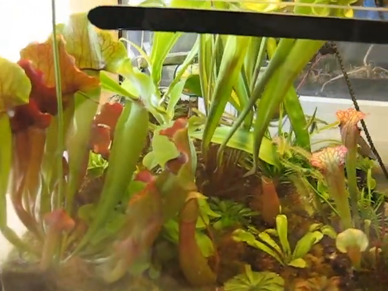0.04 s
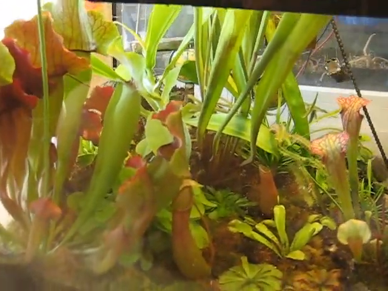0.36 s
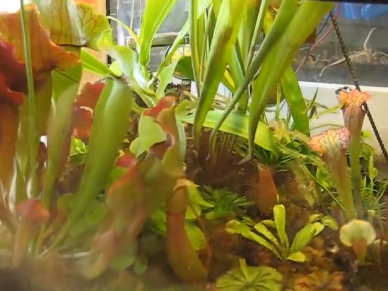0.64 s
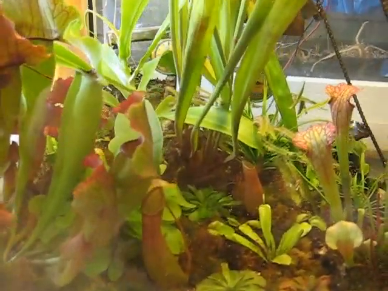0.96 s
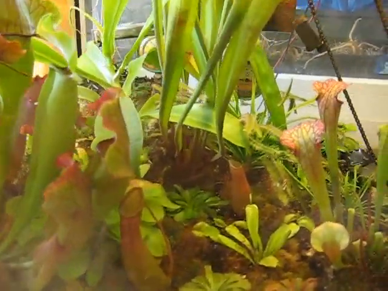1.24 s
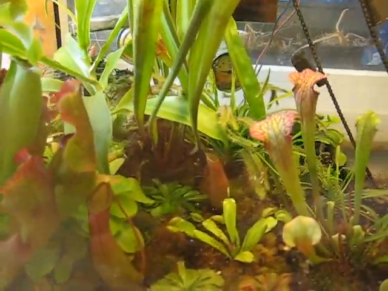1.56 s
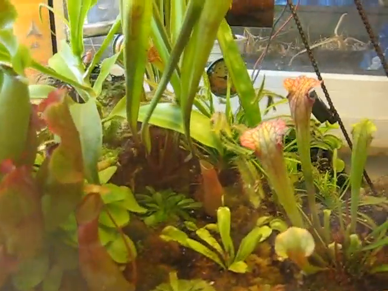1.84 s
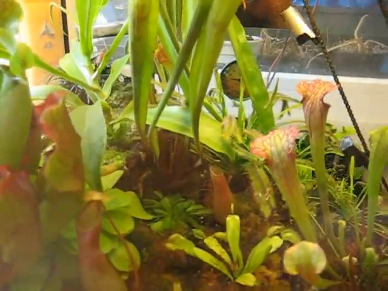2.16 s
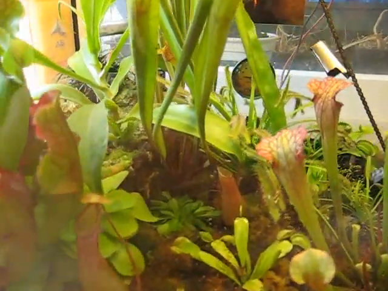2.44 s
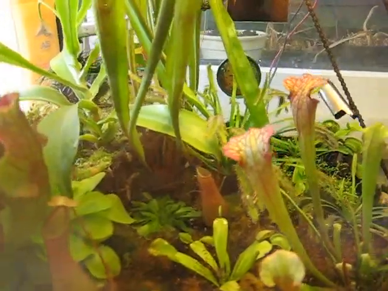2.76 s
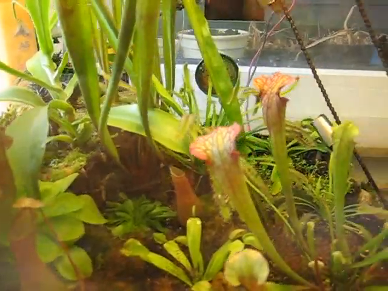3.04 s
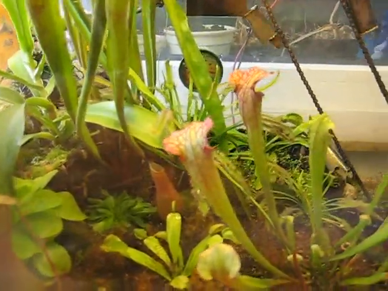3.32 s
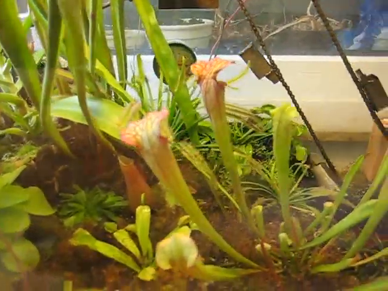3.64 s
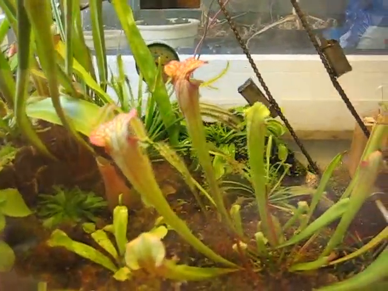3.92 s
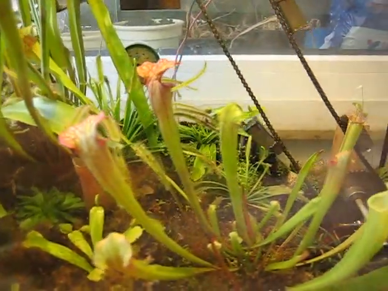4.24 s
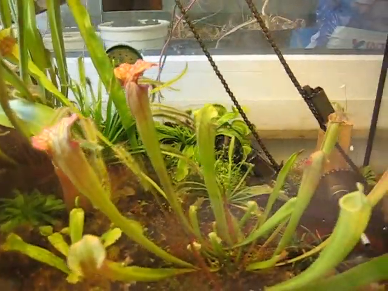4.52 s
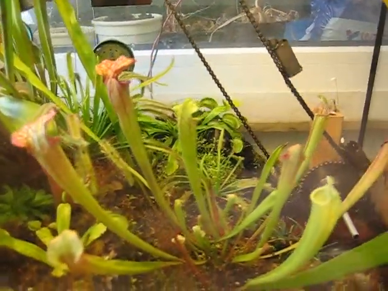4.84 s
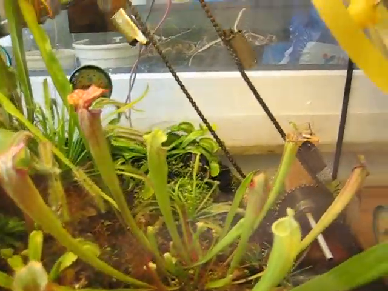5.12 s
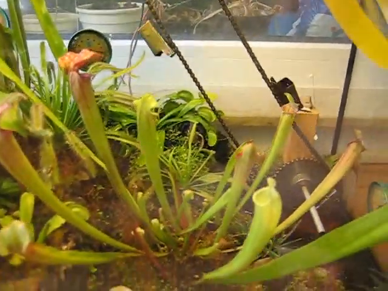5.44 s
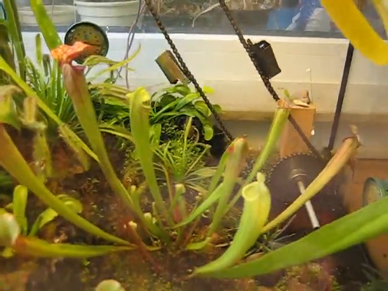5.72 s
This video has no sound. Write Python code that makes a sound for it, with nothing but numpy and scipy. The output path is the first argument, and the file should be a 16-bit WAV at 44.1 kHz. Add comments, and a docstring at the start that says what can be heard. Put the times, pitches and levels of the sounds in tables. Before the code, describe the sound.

A small geared electric motor runs throughout, close by in a small room: a low hum with gear whine, a pulsing buzz and a grainy rasp over a soft rumble. It grows louder over the first 1.5 seconds. Roughly every 1.2 seconds it sags briefly and knocks in its frame as a bucket takes up the chain's slack. Links tick lightly at loose intervals.

Tin buckets clank with a short metallic ring: a quick cluster right at the start, a loud clank at 2 seconds and a loud double one at about 3.1. A dry bearing whistles faintly and unsteadily underneath. The axle gives short, high squeaks at 4.4 and 5.6 seconds. Sharper link clicks come at 4.5, 4.7 and, strongest, 5.1 seconds. A final rattle of several bucket clanks arrives at about 5.8 to 5.9 seconds, with the motor still running.

```python
"""Tin buckets clank over the hum and buzz of a small geared motor, close by in a small room.
The motor, twenty turns a second, drives a bucket chain that lifts water in an indoor plant bed.
Its shaft knocks in the frame once a turn; every bucket brings slack, a jolt and a brief sag in speed.
Gear teeth whine and rasp, links tick on the sprocket, the dry axle squeaks, a bearing whistles faintly."""
import sys
import numpy as np
from scipy import signal
from scipy.fft import rfft, irfft, next_fast_len
from scipy.io import wavfile
from scipy.ndimage import uniform_filter1d, map_coordinates

SR = 44100
rng = np.random.default_rng(int(sys.argv[2]) if len(sys.argv) > 2 else 0)


def waveform_to_disk(signal):
    """Save audio, clipped to [-1, 1], as 16-bit WAV at the path in sys.argv[1]."""
    frames = np.transpose(np.atleast_2d(signal))
    scaled = np.clip(frames, -1, 1) * 32767
    samples = np.round(scaled).astype(np.int16)
    wavfile.write(sys.argv[1], SR, samples)


N = 263541
T = np.arange(N) / SR
TURNS_PER_S = 20.02  # free shaft speed


def amp(db):
    """Decibels to gain."""
    return 10 ** (np.asarray(db) / 20)


def unit(x):
    """x at rms 1."""
    return x / np.sqrt(np.mean(x ** 2) + 1e-20)


def along(points, hz):
    """(f/Hz, value) points read on a log axis."""
    f, values = np.transpose(points)
    return np.interp(np.log(hz + 1), np.log(f + 1), values)


def curves(rows):
    """One value per sample for each column after t/s."""
    times_s, *columns = np.transpose(rows)
    return [np.interp(T, times_s, column) for column in columns]


def wobble(knots_per_s, t=T):
    """Smooth random curve."""
    coarse_s = np.linspace(0, T[-1], int(T[-1] * knots_per_s * 5) + 2)
    knots = rng.standard_normal(int(T[-1] * knots_per_s) + 4)
    return np.interp(t, coarse_s, map_coordinates(knots, [coarse_s * knots_per_s]))


def swell(at_s, width_s):
    """Bell curve of height 1."""
    return np.exp(-((T - at_s) / width_s) ** 2)


def filtered(x, response):
    """x times a complex response of frequency."""
    size = next_fast_len(len(x) + 8192)
    return irfft(rfft(x, size) * response(np.fft.rfftfreq(size, 1 / SR)), size)[:len(x)]


def coloured(x, spectrum):
    """x shaped by (f/Hz, level/dB) points, at rms 1."""
    return unit(filtered(x, lambda hz: amp(along(spectrum, hz))))


def resonance(hz, centre_hz, width_hz):
    """Causal response of one damped mode."""
    return 1j * hz * width_hz / (centre_hz ** 2 - hz ** 2 + 1j * hz * width_hz)


def add(track, at_s, sound):
    """Mix a sound into the track."""
    part = track[max(round(at_s * SR), 0):][:len(sound)]
    part += sound[:len(part)]


# Room decay: f/Hz, t60/s
ROOM_DECAY = [(150, .25), (1000, 0.44), (6000, 0.17)]

def room(x):
    """Short wall reflections, treble dying first."""
    hz, t, bands = signal.stft(rng.standard_normal(SR // 2), SR, nperseg=256)
    decay = amp(-60 * t / along(ROOM_DECAY, hz)[:, None])
    tail = signal.istft(bands * decay, SR, nperseg=256)[1]
    return signal.fftconvolve(x, tail / np.linalg.norm(tail))[:N]


# Bearing pitch: t/s, f/Hz
BEARING_PITCH = [(1.6, 2034), (2.4, 2120), (3.0, 2160), (3.7, 1985)]

def bearing(level_db=-53, waver_db=3, jitter_hz=22):
    """A dry bearing whistles, faint and unsteady."""
    hz = curves(BEARING_PITCH)[0] + jitter_hz * wobble(40)
    tone = np.sqrt(2) * np.sin(2 * np.pi * np.cumsum(hz) / SR)
    return amp(level_db + waver_db * wobble(11)) * tone


# Stand vibration: f/Hz, relative density/dB
STAND_SPECTRUM = [(13, -57.5), (28, -17), (102, -15), (186, -6.5), (244, -13), (332, -17), (444, -18.5),
                  (500, -11), (657, -16.5), (820, -18.5), (893, -11), (1190, -29.5), (1300, -33.5),
                  (1690, -51), (2860, -120)]

def rumble(stand_db):
    """The running chain shakes the stand, over the low murmur of the room."""
    stand = amp(stand_db + 1.3 * wobble(12)) * coloured(rng.standard_normal(N), STAND_SPECTRUM)
    murmur_colour = [(20, -34.5), (32, -12.5), (50, 4.5), (100, 1), (200, -13.5), (600, -37.5),
                     (3000, -61.5)]
    murmur_db = np.interp(T, [0, 2.5], [-45, -42])
    return stand + amp(murmur_db) * coloured(rng.standard_normal(N), murmur_colour)


# Axle squeaks: t/s, length/s, f/Hz, level/dB
AXLE_SQUEAKS = [(4.39, .1, 2720, -35), (5.62, .11, 2730, -39)]

def axle(jitter=.011, octave_db=-8):
    """The dry sprocket axle squeaks under load: an unsteady tone and its octave."""
    out = np.zeros(N)
    for at_s, length_s, hz, db in AXLE_SQUEAKS:
        t = T[:int(length_s * SR)]
        phase = 2 * np.pi * np.cumsum(hz * (1 + jitter * wobble(700, t))) / SR
        tone = np.sin(phase) + amp(octave_db) * np.sin(2 * phase)
        add(out, at_s, amp(db) * np.sin(np.pi * t / length_s) * tone)
    return out


def quiet_links(per_s=2.5, level_db=-32.5, spread_db=3.5, low_hz=2970, high_hz=5340):
    """Faint ticks at loose intervals, as rows like LOUD_LINKS."""
    ring_share, t60_s = .56, .06
    return [((i + when) / per_s, level_db + spread_db * (2 * size - 1),
             low_hz + pitch * (high_hz - low_hz), ring_share, t60_s)
            for i, (when, size, pitch) in enumerate(rng.random((30, 3)))]


# Loudest links settling: t/s, level/dB, f/Hz, ring share/0-1, t60/s
LOUD_LINKS = [(1.496, -30, 5260, .5, 0.094), (1.641, -28.5, 3500, 1, .05), (1.883, -30, 5520, .5, 0.048),
              (1.98, -30, 4200, 0, 0.076), (2.322, -33.5, 3660, 0.7, 0.098), (4.5, -22, 4390, .95, 0.039),
              (4.687, -19.5, 2040, 0.6, .056), (4.955, -31, 1430, 1, 0.17),
              (5.1178, -13.5, 3000, .8, 0.018), (5.118, -23.5, 1350, 1, 0.052),
              (5.335, -27.5, 2330, 0.2, 0.073)]

def chain(width_hz=520):
    """Links drop onto the sprocket: a dry tick with one short resonance."""
    out, t = np.zeros(N), T[:SR // 5]
    tick_colour = [(600, -13), (1500, -1.5), (3200, -4), (5500, -3), (7000, -22.5)]
    for at_s, db, hz, ring_share, t60_s in LOUD_LINKS + quiet_links():
        ring = unit(filtered(rng.standard_normal(len(t)), lambda f: resonance(f, hz, width_hz) ** 2))
        tick = coloured(rng.standard_normal(len(t)), tick_colour)
        link = np.sqrt(ring_share) * ring + np.sqrt(1 - ring_share) * tick
        add(out, at_s, amp(db - 60 * t / t60_s) * link)
    return out


# Tin bucket modes: f/Hz, relative level/dB, t60/s
TIN_MODES = [(1017, -1.5, .7), (1166, -7, .35), (1270, -5, .16), (1448, -6, .42), (1596, -9, .35),
             (1645, -6, .56), (1793, -6, .36), (1908, -7, .3), (2005, -9, .42), (2195, -16, .35),
             (2299, -15, .45), (2433, -10, .47), (2578, -10, .42), (2618, -9, .36), (2730, -10, .2),
             (2955, -9, .22), (3025, -6, .13), (3195, -11, .3), (3472, -10, .45), (3790, -9, .28),
             (3989, -9, .24), (4178, -9, .32), (4323, -10, .34), (4540, -13, .3), (5220, -14, .3),
             (5770, -22, .23)]
# Blows: t/s, ring/dB, crack/dB, t60 factor, lowest-mode boost/dB, contact f/Hz, contact boost/dB
BUCKET_BLOWS = [(.001, -25.5, -22.5, 1.14, 2, 1570, 13.5), (0.0591, -26, -17, 0.8, -11.5, 2620, 14.5),
                (.075, -27, -29.5, 1.2, 12.5, 2299, 22), (2.039, -19.5, -13, 1, -4, 1420, 8.5),
                (2.11, -33, -24.5, 0.67, -9.5, 1645, 10), (3.0581, -25.5, -17, 0.84, -5, 1448, 18),
                (3.092, -21, -14.5, 1.14, 8, 2440, 1), (5.83, -27, -20, 0.78, 2, 1290, 11),
                (5.846, -27, -21, 1.2, 3, 1900, 10), (5.895, -27.5, -24, 0.91, 1.5, 1910, 9.5),
                (5.913, -26, -16, 0.44, -2.5, 1270, 16)]

def buckets(rise_s=.00057, crack_t60_s=.14, contact_width_hz=55, scatter_db=1.5):
    """Each blow rattles briefly and rings the tin, favouring the modes under the point of contact."""
    rings, cracks, t = np.zeros(N), np.zeros(N), T[:SR * 3 // 4]
    hz, mode_db, t60_s = np.transpose(TIN_MODES)
    crack_colour = [(300, -27), (800, -1), (1300, 6), (1700, -9), (2200, -4.5), (3000, 3.5),
                    (4400, -1.5), (6000, -12.5), (7000, -20.5)]
    rise = 1 - np.exp(-t / rise_s)
    for at_s, ring_db, crack_db, stretch, lowest_db, contact_hz, boost_db in BUCKET_BLOWS:
        contact_db = boost_db * np.exp(-((hz - contact_hz) / contact_width_hz) ** 2)
        db = mode_db + contact_db + scatter_db * rng.standard_normal(len(hz))
        db[0] += lowest_db
        modes = np.sin(2 * np.pi * (hz[:, None] * t + rng.random((len(hz), 1))))
        decays = amp(db[:, None] - 60 * t / (stretch * t60_s[:, None]))
        add(rings, at_s, amp(ring_db) * rise * np.sum(decays * modes, axis=0))
        rattle = coloured(rng.standard_normal(len(t)), crack_colour)
        add(cracks, at_s, amp(crack_db - 60 * t / crack_t60_s) * rise * rattle)
    return rings, cracks


# Tooth scrape: f/Hz, relative density/dB
SCRAPE_SPECTRUM = [(800, -19), (1200, -2), (1450, -1.5), (1680, -5), (1950, 3.5), (2350, 0), (3000, 0),
                   (3800, -0.5), (4400, -6), (5000, -4), (5600, -7.5), (6200, -23), (7000, -30)]
# Gear case modes: f/Hz, width/Hz, relative level/dB facing the plants, same facing the sprocket
CASE_MODES = [(2120, 220, -12, -15), (2624, 120, -9, -16.5), (2890, 53, -10, -6.5), (3105, 130, -3, -13.5),
              (4116, 110, -8, -15), (4370, 160, -18.5, -5.5)]

def rasp(turns, press, level_db, repeat_share=.6, grain_db=1.6, case_db=-3.5, hiss_db=-1.5):
    """Rough teeth scrape in a similar grainy pattern on every turn and ring the gear case."""
    roughness = rng.standard_normal(SR // 20)
    teeth = map_coordinates(roughness, [turns % 1 * len(roughness)], mode="grid-wrap")
    scrape = np.sqrt(repeat_share) * teeth + np.sqrt(1 - repeat_share) * rng.standard_normal(N)
    scrape *= amp(grain_db * wobble(600) + 1.1 * wobble(30) + .9 * press)
    facing = np.interp(T, [2.4, 3.8], [0, 1])  # the listener turns from plants to sprocket
    case = np.zeros(N)
    for hz, width_hz, plants_db, sprocket_db in CASE_MODES:
        ring = unit(filtered(scrape * amp(2 * press), lambda f: resonance(f, hz, width_hz)))
        case += amp(plants_db + facing * (sprocket_db - plants_db) + wobble(3.5)) * ring
    return amp(level_db) * (amp(case_db) * case + amp(hiss_db) * coloured(scrape, SCRAPE_SPECTRUM))


def mesh(turns, orders, waver_db, slip_rad):
    """Gear teeth sing at multiples of the shaft speed, each line wavering in level and phase."""
    step = 8  # synthesized at SR / step
    t, shaft = T[::step], turns[::step]
    lines = np.zeros(len(t))
    for order, db in orders:
        gain = amp(db + waver_db * wobble(3.962, t))
        phase = 2 * np.pi * (order * shaft + rng.random()) + slip_rad * wobble(6, t)
        lines += gain * np.cos(phase)
    return unit(signal.resample_poly(lines, step, 1)[:N])


# Gear mesh lines: shaft order, relative level/dB
WHINE_ORDERS = [(24, -6.5), (25, 3.5), (26, -12.5), (28, -18), (29, -2.5), (30, -8), (31, -6), (32, -8)]
# Gearbox buzz envelope: f/Hz, relative level/dB
BUZZ_SPECTRUM = [(270, 4.5), (340, 1), (400, -3), (460, -11.5), (640, -23.5), (700, 0.5), (780, 2),
                 (830, -10), (900, 2), (950, -6), (1080, 0.5), (1140, -12.5), (1270, -13.5)]

def gears(turns, press, whine_db, buzz_db, swing_db=4.5, swing_from_hz=960):
    """A few strong mesh lines over a dense buzz whose top pulses once a turn."""
    whine = mesh(turns, WHINE_ORDERS, waver_db=1.2, slip_rad=.2)
    upper = mesh(turns, [(45, 0), (46, -4)], waver_db=2, slip_rad=.3)
    upper_db = np.interp(T, [1.9, 3.4], [-38, -45])  # fades as the listener turns away
    orders = np.arange(14, 66)
    buzz_lines = zip(orders, along(BUZZ_SPECTRUM, orders * TURNS_PER_S))
    buzz = mesh(turns, buzz_lines, waver_db=3, slip_rad=.3)
    top = filtered(buzz, lambda hz: hz > swing_from_hz)
    buzz = buzz - top + top * unit(amp(swing_db * press))
    return amp(whine_db) * whine + amp(upper_db) * upper + amp(buzz_db) * buzz


# Frame hum: shaft order, relative level/dB
HUM_ORDERS = [(1, -38), (2, -21), (3, -26.5), (4, -15), (5, -21.5), (6, -21.5), (7, -7), (8, -16), (9, 1),
              (10, -2), (11, -30.5), (12, -14.5), (13, -26.5)]

def frame(turns, side, knock_gain, level_db, first_knock_s=.0495, frame_hz=184, width_hz=75):
    """The shaft shakes the frame once a turn; under a jolt it knocks hard and rings the gearbox panel."""
    shaft = turns - first_knock_s * TURNS_PER_S
    hum = np.zeros(N)
    for order, db in HUM_ORDERS:
        lag_rad = np.angle(resonance(order * TURNS_PER_S, frame_hz, width_hz=42))
        flip = side if order % 2 else 1  # half a turn inverts the odd orders
        hum += flip * amp(db) * np.cos(2 * np.pi * order * shaft + lag_rad)
    half_turn = np.diff(np.floor(2 * shaft), prepend=0) > 0
    contact = half_turn & (side * np.cos(2 * np.pi * shaft) > .5)
    body = lambda hz: resonance(hz, frame_hz, width_hz) ** 2
    panel = lambda hz: amp(-20) * resonance(hz, 770, 260) ** 2
    thud = filtered(contact * knock_gain, lambda hz: body(hz) + panel(hz)) * SR / (np.pi * width_hz)
    return amp(level_db) * (amp(wobble(4)) * unit(hum) + amp(8.5) * thud)


# A new bucket takes up the slack: t/s, relative knock level/dB
BUCKET_LIFTS = [(.765, -15), (2.022, -1), (3.21, -3.5), (4.42, -7), (5.64, -6)]
# Free-running levels as the listener nears the drive: t/s, hum/dB, whine/dB, buzz/dB, rasp/dB
DRIVE_LEVELS = [(0, -34.5, -39, -38, -41), (.5, -30, -36, -37, -40.5), (1.45, -26.5, -32, -34, -37.5),
                (2.8, -25, -31.5, -32.5, -37.5), (4, -25, -31.5, -34.5, -37.5),
                (5.3, -25.5, -30, -34, -36.5), (5.95, -29, -31.5, -36, -37.5)]

def motor(sag_turns_per_s=.52, sag_delay_s=.1, jolt_delay_s=.17, jolt_width_s=.08, press_turns=.45):
    """One shaft drives hum, gears and rasp; each bucket slackens the chain, slows it, snaps it taut."""
    lifts_s = [at_s for at_s, _ in BUCKET_LIFTS]
    slack = sum(swell(at_s, width_s=.081) for at_s in lifts_s)
    sag = sum(swell(at_s + sag_delay_s, width_s=.15) for at_s in lifts_s)
    jolts = [swell(at_s + jolt_delay_s, jolt_width_s) for at_s in lifts_s]
    knock_gain = sum(amp(db) * pulse for (_, db), pulse in zip(BUCKET_LIFTS, jolts))
    jolt = sum(jolts)
    turns = np.cumsum(TURNS_PER_S - sag_turns_per_s * sag) / SR
    # each bucket throws the shaft to the other side of its play
    side = uniform_filter1d((-1.) ** np.searchsorted(lifts_s, T), size=1300)
    press = side * np.cos(2 * np.pi * (turns - press_turns))  # an off-centre wheel presses the teeth
    hum_db, whine_db, buzz_db, rasp_db = curves(DRIVE_LEVELS)
    hum_db += .6 * jolt - 5.5 * slack
    whine_db -= 2.5 * sag
    buzz_db += jolt + .5 * slack
    rasp_db += .7 * jolt - 2.5 * slack
    return (frame(turns, side, knock_gain, hum_db) + gears(turns, press, whine_db, buzz_db)
            + rasp(turns, press, rasp_db) + rumble(buzz_db + 2))


def scene():
    """Buckets, chain and axle echo in the room, on top of the motor."""
    drive = motor() + bearing()
    rings, cracks = buckets()
    metal = rings + chain() + axle()
    echo = room(amp(-15) * metal + amp(-7) * cracks)
    return (drive + metal + cracks + echo)[None]


def gain_control(x, threshold_db=-17.5, sense_from_hz=1000, recovery_db_per_s=29.5):
    """Loud, bright sounds turn the gain down at once; it creeps back at a steady rate."""
    power = uniform_filter1d(filtered(x, lambda hz: hz > sense_from_hz) ** 2, size=300)
    over_db = np.maximum(10 * np.log10(np.abs(power) + 1e-12) - threshold_db, 0)
    recovery_db = recovery_db_per_s * T
    return x * amp(recovery_db - np.maximum.accumulate(over_db + recovery_db))


def record(dry):
    """The level ducks under loud clanks; the treble rolls off to a hard band limit."""
    roll_off, top_hz = [(5600, -.5), (6400, -5), (7100, -25.5)], 7100
    return filtered(gain_control(dry[0]), lambda hz: amp(along(roll_off, hz)) * (hz < top_hz))[None]


dry = scene()
out = record(dry)
waveform_to_disk(out)
```